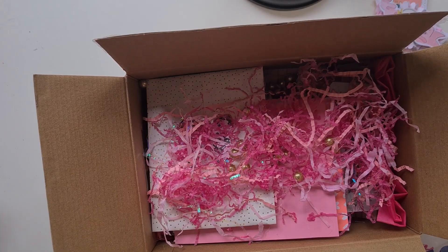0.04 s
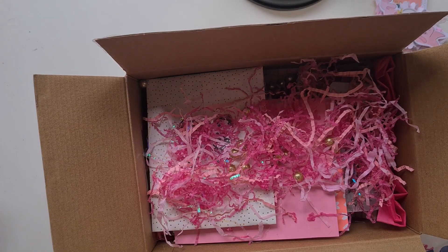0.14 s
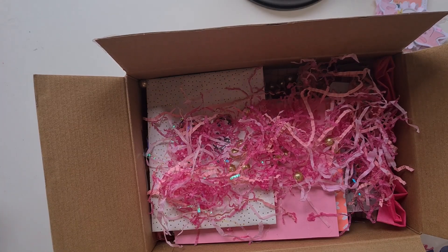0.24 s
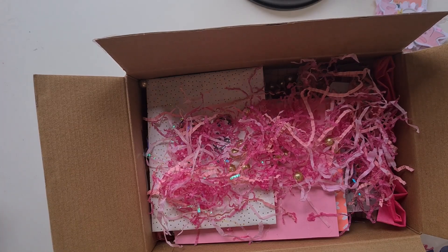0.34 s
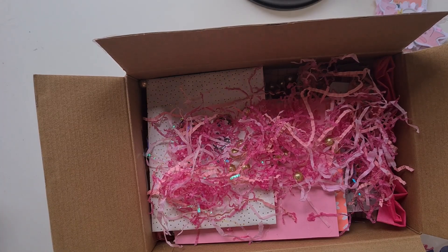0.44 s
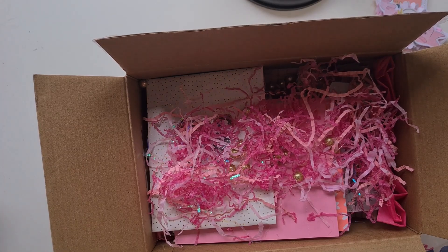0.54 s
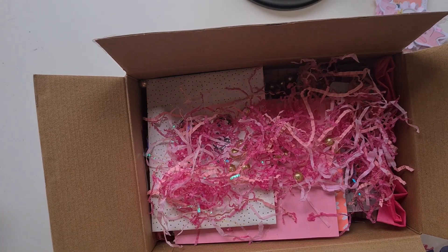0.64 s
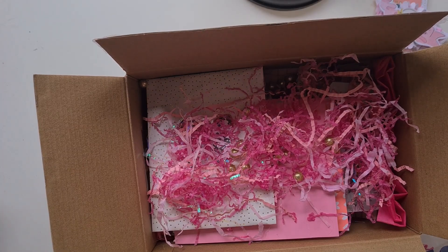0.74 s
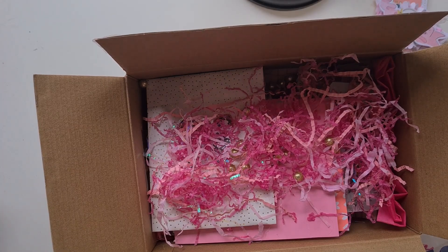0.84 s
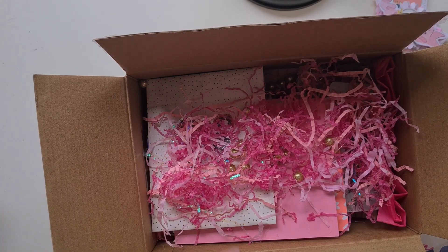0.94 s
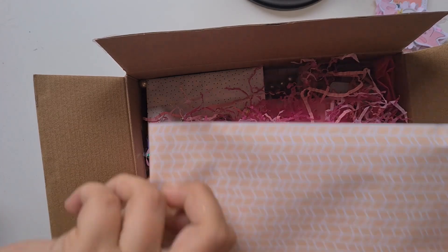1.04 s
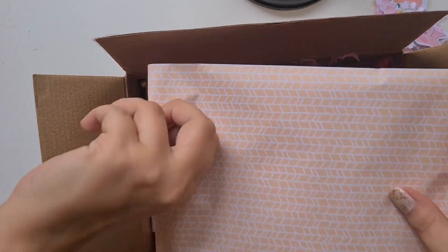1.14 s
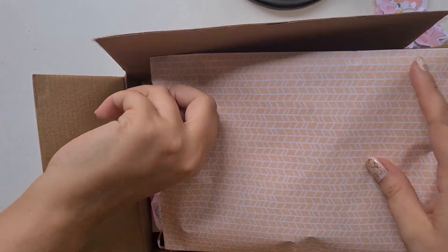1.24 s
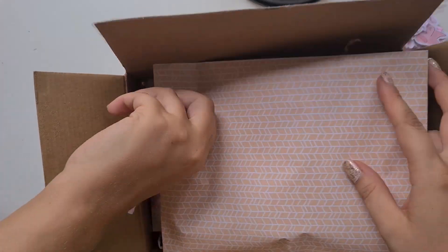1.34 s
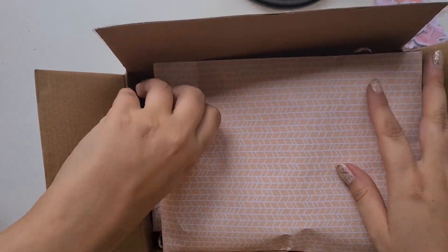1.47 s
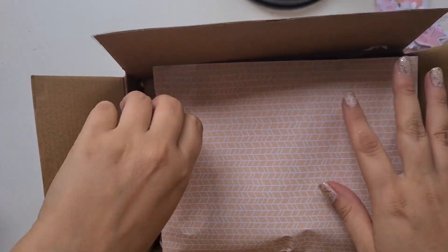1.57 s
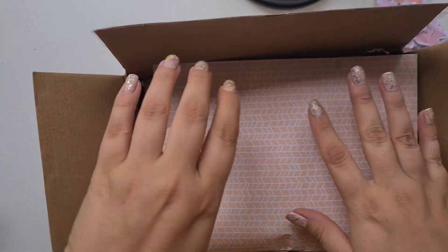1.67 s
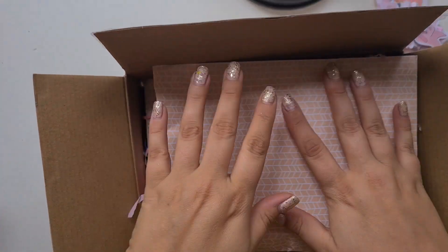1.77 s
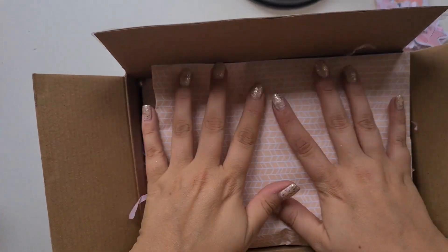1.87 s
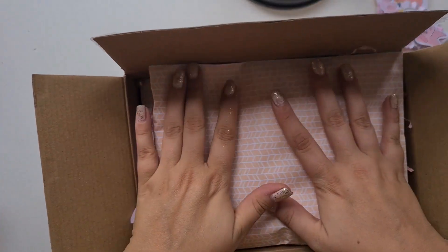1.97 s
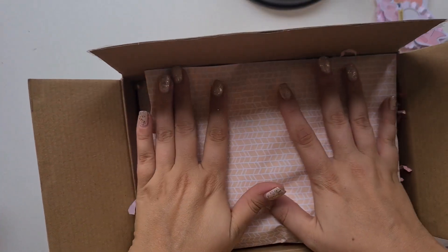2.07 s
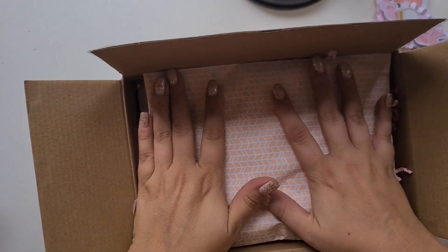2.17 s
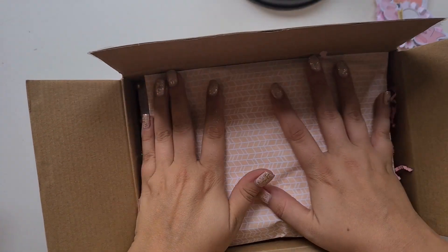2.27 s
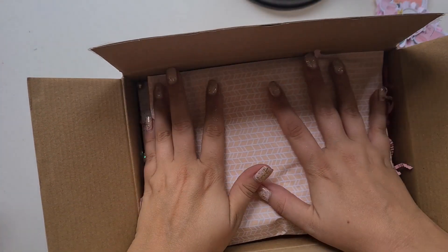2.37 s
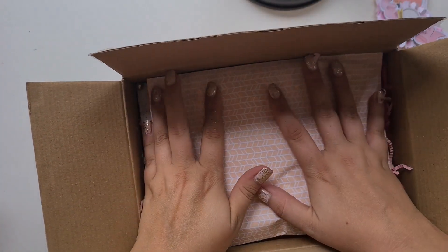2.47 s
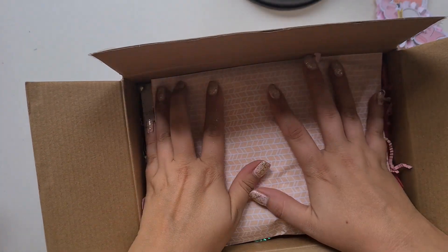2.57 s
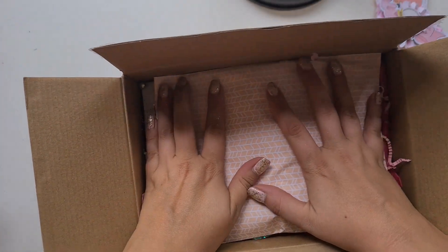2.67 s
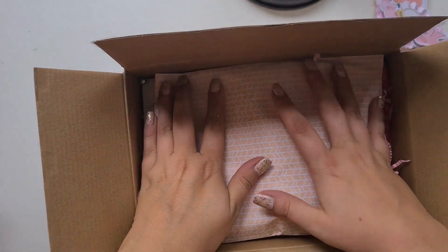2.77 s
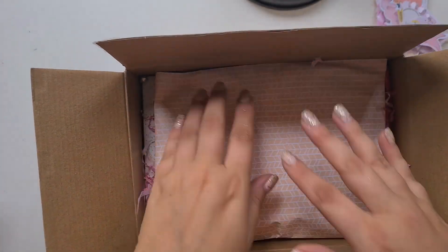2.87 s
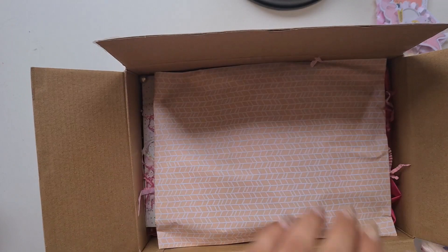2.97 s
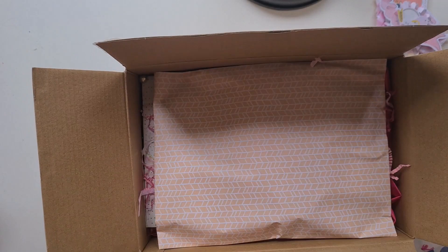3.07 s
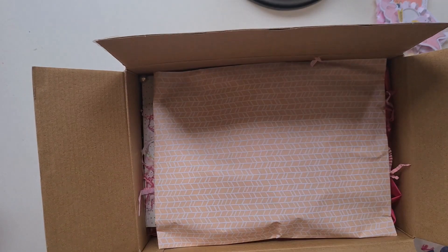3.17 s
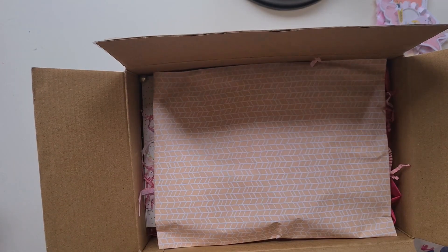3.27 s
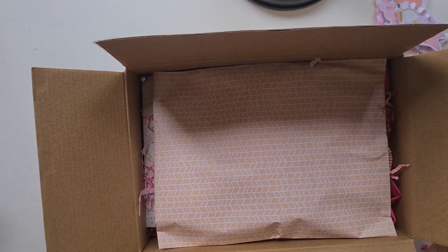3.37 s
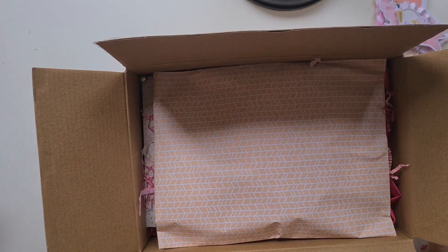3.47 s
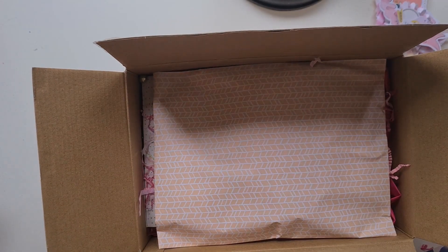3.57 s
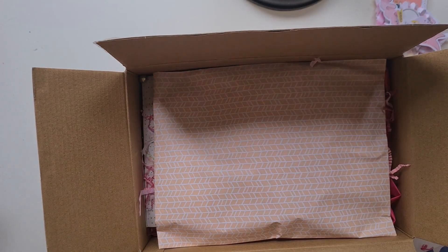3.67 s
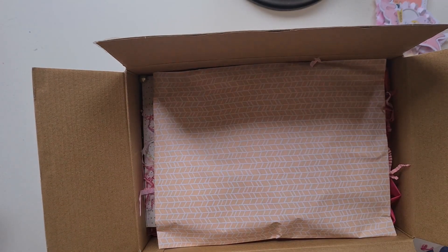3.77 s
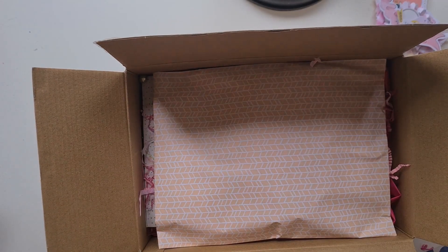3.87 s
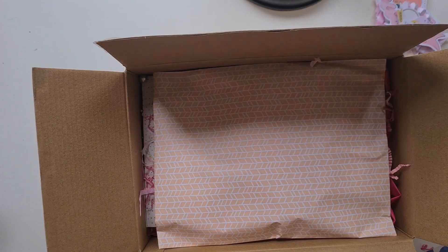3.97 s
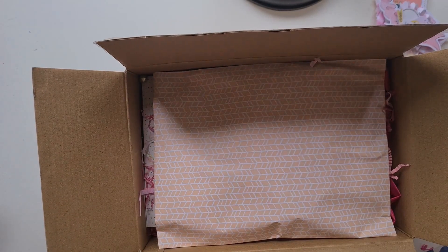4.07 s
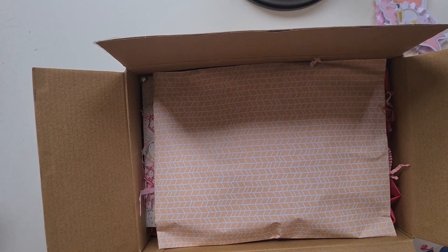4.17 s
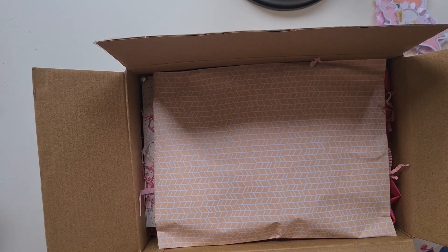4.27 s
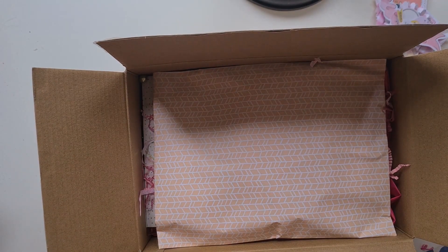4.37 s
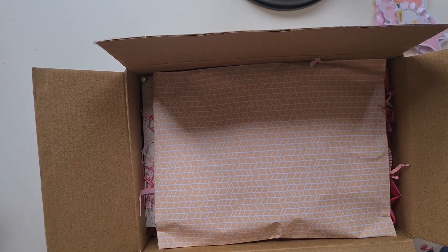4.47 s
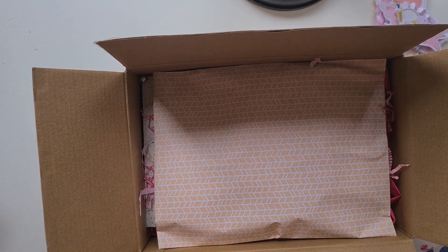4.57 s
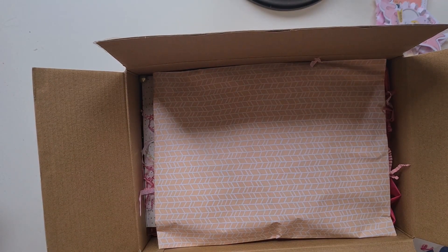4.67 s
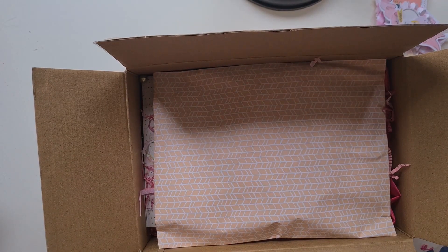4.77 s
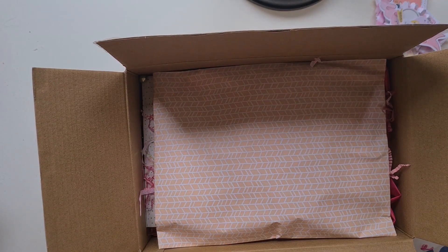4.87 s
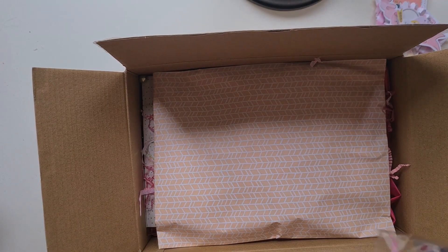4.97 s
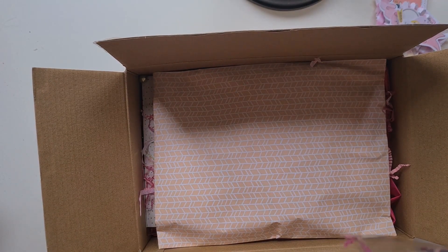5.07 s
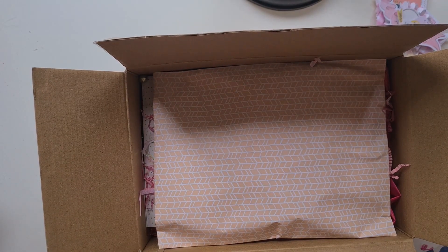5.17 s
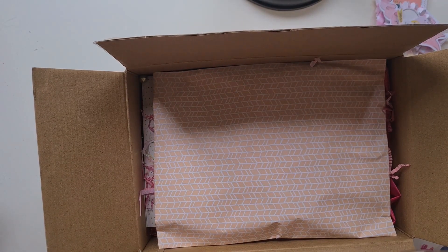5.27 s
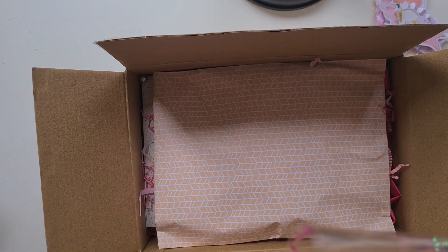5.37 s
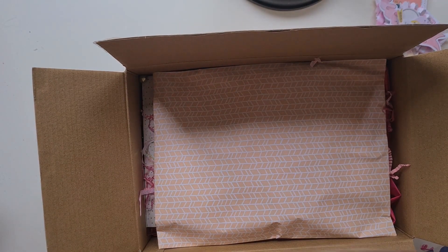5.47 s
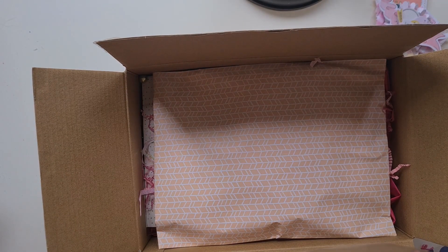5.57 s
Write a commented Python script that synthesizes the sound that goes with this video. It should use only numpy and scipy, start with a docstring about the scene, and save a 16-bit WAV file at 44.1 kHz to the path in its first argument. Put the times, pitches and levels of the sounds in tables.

```python
"""From the start, over faint room tone, hands slide a sheet of paper onto shredded filler in a cardboard box.
Tiny slips make its rustle, buckling patches snap sharply and short rubs sing; the box colours the paper.
Dull knocks follow as the sheet is pressed down. Then, beside the box, a thinner wrapping rustles and something
knocks on the table: noise for the clack, dying tones for the thud, fading narrow noise with a few tones
for the thin ring. A very short dry tick follows. Dense reflections from close walls surround it all."""
import sys
import numpy as np
from scipy import signal
from scipy.fft import rfft, irfft
from scipy.io import wavfile
from scipy.ndimage import uniform_filter1d, map_coordinates

SR = 44100
rng = np.random.default_rng(int(sys.argv[2]) if len(sys.argv) > 2 else 0)


def wav_record(signal):
    """Record a signal, one row per channel, as 16-bit PCM in the file named by sys.argv[1]."""
    frames = np.transpose(np.atleast_2d(signal))
    bounded = np.clip(frames, -1, 1)
    # unit amplitude maps onto the largest positive 16-bit level
    quanta = np.round(bounded * 32767).astype(np.int16)
    wavfile.write(sys.argv[1], SR, quanta)


N = 248283  # length in samples

# Faint steady room tone. Each row: frequency in Hz, relative level in dB.
ROOM_TONE_SPECTRUM = [(20, -18), (36, -30), (47, 2.5), (62, -10.5), (100, -5.5), (150, -26.5), (400, -26),
                      (1000, -27.5), (3000, -33), (7000, -33.5), (9000, -46.5), (16000, -41.5)]
# Hands moving the paper. Each row: start in seconds, length in seconds, level in dB before a common trim,
# body (low tones) in dB, fizz (high tones) in dB.
STROKES = [(0, 0.42, -50.5, 1, 3), (0.482, .03, -65, 6, 17.5), (0.565, 0.68, -58, 6.5, 5),
           (0.696, .065, -41.5, -6.5, -7), (0.839, 0.065, -47, 6.5, -2), (0.927, 0.033, -45, -2, 1),
           (1.01, .18, -46.5, 1.5, 2.5), (1.201, 0.39, -44, -2, 3.5), (1.271, 0.096, -39.5, 3.5, 8.5),
           (1.321, 0.14, -35.5, 7.5, -9), (1.56, 0.046, -43, 7, -18), (1.808, 0.058, -32.5, 2, -3.5),
           (1.869, 0.64, -39.5, 4, -2.5), (2.02, 0.074, -35.5, -4, 0), (2.12, 0.049, -27.5, 1, 1),
           (2.29, .12, -31, 7.5, -4), (2.508, 0.34, -39, 1, 2), (2.612, 0.065, -34.5, 6, 2),
           (2.745, 0.076, -30, 3, -5), (2.898, 0.03, -39.5, 3.5, 4.5), (2.954, 0.75, -63, 10, -2),
           (3.437, 0.06, -56, 7, -8), (3.478, 0.68, -44.5, 0.5, -0.5), (3.585, 0.13, -39, -1, 1.5),
           (3.834, 0.079, -33.5, 6.5, 3.5), (3.908, 0.091, -41.5, 11.5, -11.5), (4.03, .035, -38, 6, -36),
           (4.2, .07, -61.5, 12, -32), (4.573, 0.031, -62, 10, -11), (4.656, 0.35, -43, -0.5, 1.5),
           (4.712, 0.07, -31, -0.5, 1.5), (4.806, 0.034, -32, 4.5, -6), (4.996, 0.1, -28, 4, -3),
           (5.078, 0.55, -37.5, 1, 2), (5.134, 0.033, -30, 0.5, 0), (5.261, 0.18, -33.5, 2, -1.5),
           (5.546, 0.045, -32, 3, 1)]
# Colour of the sheet before the box shapes it. Each row: frequency in Hz, relative level in dB.
SHEET_SPECTRUM = [(40, -37), (70, -10.5), (130, -6.5), (220, -3), (400, -3), (700, -3.5), (1150, 1),
                  (1600, -4), (2400, -5.5), (3300, -4.5), (6400, -8), (9500, -16.5), (13000, -16),
                  (16000, -19.5)]
# Peaks and dips the box adds to the sheet. Each row: frequency in Hz, width in Hz, height in dB.
BOX_RESONANCES = [(273, 34, 3), (467, 14, 8), (500, 32, -8), (600, 74, 4.5), (700, 27, 3), (772, 24, 6),
                  (1160, 45, 2.5), (1895, 250, 4.5), (6250, 180, 1.5)]
# Colour of the thinner wrapping. Each row: frequency in Hz, relative level in dB.
WRAPPING_SPECTRUM = [(29, -16.5), (50, -8.5), (91, 0.5), (175, -3), (439, -1), (615, -5.5), (765, -3),
                     (927, -4), (1180, 2.5), (1540, -2.5), (3180, 0), (6710, -2), (9410, -10),
                     (12600, -6.5), (16000, -13.5)]
# Patches of paper that buckle, and at 4.147 s just a very short dry tick. Each row: start in seconds,
# level in dB over 4 ms before a common trim, pitch of the resonance in Hz, fizz in dB, decay time in seconds.
SNAPS = [(.005, -38.5, 790, -16, 0.0022), (0.0216, -37.5, 4740, -19, 0.0034),
         (0.0983, -38.5, 6360, 5, .002), (.1397, -42, 1000, -8, 0.0024), (0.1837, -42, 750, -3, 0.0038),
         (0.2322, -36, 1370, 0, 0.0029), (0.274, -25.5, 1800, 12.5, 0.0015),
         (0.3695, -45, 700, -2, 0.00079), (0.5435, -47.5, 790, -19, .004), (0.581, -35.5, 1640, -6, 0.0054),
         (0.591, -38, 2000, -11, 0.0034), (0.7002, -45, 2970, -3, 0.0015), (.7145, -33, 3500, -8, .0025),
         (.741, -28.5, 6360, -18, 0.0017), (0.8605, -33, 3200, -4, 0.0028),
         (0.8758, -29.5, 2100, -16, 0.0035), (1.004, -37.5, 4360, 2, 0.0011),
         (1.1147, -25, 5170, -13, 0.0021), (1.157, -34, 3520, 3, 0.0022),
         (1.2117, -22.5, 3670, -0.5, 0.0026), (1.2337, -20, 4720, -8, 0.0017),
         (1.2835, -28.5, 1230, -3, 0.002), (1.3929, -26, 3550, 1, 0.00087),
         (1.4064, -27, 3920, -11, 0.00076), (1.4774, -24, 700, -11, .0012), (1.8209, -29, 4770, 0, 0.0014),
         (1.8405, -26.5, 4200, 12, 0.00061), (1.8503, -18, 3580, -10, .0008),
         (1.9354, -25, 2250, 4, 0.00099), (2.0116, -28, 5700, -8, 0.0035), (2.0364, -22, 3220, 1.5, 0.0016),
         (2.07, -23, 1220, 3.5, 0.00065), (2.2498, -24, 2650, 11, 0.00085), (2.2667, -19, 700, -11, 0.0011),
         (2.2997, -18.5, 3000, 1, 0.00067), (2.334, -23, 1000, 8, 0.00083),
         (2.3797, -32.5, 6760, 15, 0.00063), (2.4406, -28, 2000, -21, 0.0015),
         (2.5251, -24, 1180, -1, 0.00049), (2.5387, -17.5, 6540, -8.5, 0.0013),
         (2.5928, -17.5, 850, -7, 0.0014), (2.6268, -25.5, 890, -3, 0.00072),
         (2.6406, -23, 2220, 14, 0.0013), (2.658, -23, 2680, -8, .0005), (2.6785, -25.5, 3000, 6.5, .0008),
         (2.7243, -26, 2930, 12.5, 0.00069), (2.7532, -23, 3230, 7.5, 0.0018),
         (2.773, -29, 1370, 12.5, 0.0042), (2.8439, -24, 700, 5.5, 0.00087), (3.1947, -57, 1650, 9, 0.0034),
         (3.3904, -47, 810, -32, 0.00066), (3.5036, -35.5, 6500, 7, 0.0026),
         (3.5873, -28, 1040, 0.5, 0.0045), (3.643, -36.5, 2240, 11, .001), (3.791, -35, 3500, 9, 0.0037),
         (3.9507, -31, 3580, -6, .0024), (4.147, -38, 5970, 1, 0.00027), (4.391, -59.5, 4300, 9.5, 0.0028),
         (4.5545, -57, 4770, -6, .001), (4.6701, -33.5, 2500, 2, 0.0022), (4.6913, -28.5, 2760, 1, 0.00091),
         (4.8129, -30.5, 6360, -0.5, .0016), (4.8317, -24, 920, 0, 0.0017),
         (4.9047, -25.5, 7000, -16, 0.0014), (4.9917, -31, 7000, -1, .002),
         (5.0472, -35, 3560, 20.5, 0.00068), (5.086, -25, 1490, -14, 0.0006),
         (5.1734, -23.5, 700, 6, 0.0068), (5.2399, -28.5, 2130, 8.5, 0.0018),
         (5.4743, -28.5, 700, 2, 0.0015), (5.5879, -29, 2190, 5.5, 0.0012)]
# Paper sliding on paper and singing briefly. Each row: start in seconds, length in seconds,
# pitch in Hz, width in Hz, level in dB.
RUBS = [(1.401, 0.055, 724, 200, -37.5), (1.567, 0.04, 1060, 300, -39), (2.127, 0.027, 6200, 800, -30.5),
        (2.759, 0.034, 1160, 300, -36), (2.895, 0.026, 1200, 500, -39), (3.521, 0.039, 2230, 500, -39.5),
        (4.024, .03, 3680, 600, -39.5), (4.292, 0.05, 500, 140, -49.5), (4.664, 0.036, 2500, 330, -35)]
# Blows on the box, then the table. Each row: start in seconds, thud in dB, clack in dB,
# clack decay time in seconds, thin ring in dB.
KNOCKS = [(2.297, -31, -50, .004, -88), (2.5138, -23, -43, 0.0061, -77), (2.523, -27, -60, .004, -82.5),
          (2.629, -27, -51, .004, -80), (2.810, -32.5, -52, .004, -80), (3.285, -47, -49, .003, -85),
          (3.845, -24.5, -12.5, 0.0055, -19.5), (3.908, -37, -22, 0.0044, -43),
          (4.0461, -23.5, -19.5, 0.0083, -38), (4.294, -46.5, -48.5, 0.0022, -79)]
# Tones of a thud before the box or table scales its pitch and speed. Each row: frequency in Hz,
# relative level in dB, time to fall by 60 dB in seconds.
THUD_MODES = [(109, -17.5, 0.25), (197, -2, 0.057), (251, -3, 0.079), (336, -12, 0.063), (416, -9.5, 0.1),
              (557, -17.5, 0.16), (736, -4.5, 0.0358), (1200, -3, 0.032)]
# Clear tones in the thin ring. Each row: frequency in Hz, relative level in dB,
# time to fall by 60 dB in seconds.
THIN_RING_MODES = [(12470, -12, .17), (12600, -17, .17), (13200, -13, .17), (13119, -18, .17)]
# Colour of the clack. Each row: frequency in Hz, relative level in dB.
CLACK_SPECTRUM = [(60, -40), (150, -24.5), (250, 7.5), (410, 5.5), (600, -9.5), (780, -2), (1100, 2.5),
                  (1800, -6.5), (3700, -3.5), (6300, -6), (9500, -18), (12700, -18), (16000, -28)]
# How fast reflections die. Each row: frequency in Hz, time to fall by 60 dB in seconds.
ROOM_DECAY = [(150, 0.27), (400, 0.28), (1000, 0.2), (3000, 0.23), (7000, 0.22), (15000, 0.24)]
# Strength of the reflections. Each row: frequency in Hz, level against the direct sound in dB.
ROOM_LEVEL = [(100, -9), (300, -5.5), (700, -6.5), (1500, -2.5), (8000, -4), (15000, -7.5)]
# Lean of rustle, rubs and knocks. Each row: frequency in Hz, left minus right in dB.
BALANCE = [(100, -8.5), (600, -0.6), (2500, -0.8), (5000, -2), (10000, -2.5), (14000, -5.5)]
# Stereo width. Each row: frequency in Hz, gain in dB on the difference between left and right.
WIDTH = [(50, -6.5), (150, -11), (350, -6), (700, -4.5), (1400, 0.5), (3000, 0), (16000, -0.5)]

WRAPPING_FROM_S = 3.42  # the wrapping and the table replace the sheet and the box
WRAPPING_LAG_S = 0.00028  # the wrapping lies to the right, so the left channel hears it later
ATTACK_S, RELEASE_S, SAG_DB = 0.014, 0.013, -3  # each stroke gathers speed, eases off a little and stops
SHEET_PAN_DB, WRAPPING_PAN_DB, PAN_SPREAD_DB = -1.8, -7, 3.5  # left minus right, for snaps
SNAP_DB, SNAP_BODY_DB, THINNER_DB_PER_DB = -31, -6.5, 0.36  # a typical snap; a harder one has less body
CREASE_DB, CREASE_SPREAD_DB, CREASE_FIZZ_DB = -1, 2.5, 6.5  # lesser snaps, against the stroke level
CREASE_HZ, CREASE_OCTAVES, CREASE_DECAY_S = 2000, 1.0, 0.0015  # their middle pitch, spread and decay
THIN_HZ, THIN_WIDTH_HZ, THIN_DECAY_S = 12860, 1000, 0.014  # a noise band around the thin ring's clear tones
BOX_PITCH, TABLE_PITCH = 0.85, 1.032  # the soft-filled box thuds lower and longer than the table
EDGE_HZ = 16000  # top of the sound's range


def amp(db):
    """Turns decibels into gain."""
    return 10 ** (np.asarray(db) / 20)


def evened(x):
    """Scales to an rms (average strength) of 1."""
    return x / np.sqrt(np.mean(x ** 2) + 1e-20)


def read(points, hz):
    """Reads between the rows of a table, with frequency on a log scale."""
    f, value = np.transpose(points)
    return np.interp(np.log(hz + 1), np.log(f + 1), value)


def bins(size):
    """Lists the frequencies in the spectrum of this many samples."""
    return np.fft.rfftfreq(size, 1 / SR)


def add(mix, s, sound):
    """Adds a stereo sound at time s in seconds."""
    part = mix[:, max(round(s * SR), 0):][:, :sound.shape[1]]
    part += sound[:, :part.shape[1]]


def colour(x, gain):
    """Filters to the given gains; it rings only after what excites it."""
    both_halves = np.r_[gain, gain[-2:0:-1]]
    log_gain = np.log(np.maximum(both_halves, 1e-5))
    taps = np.fft.ifft(np.exp(np.conj(signal.hilbert(log_gain)))).real
    return signal.oaconvolve(x, taps[None, :len(gain)], axes=1)[:, :x.shape[1]]


def room_tone():
    """A faint steady rumble and hiss, made from coloured noise."""
    noise = rfft(rng.standard_normal((2, N)))
    return amp(-58) * evened(irfft(noise * amp(read(ROOM_TONE_SPECTRUM, bins(N))), N))


def stroke_gains(t):
    """Strength of every stroke at times t: attack, sagging hold, release; shape (strokes, times)."""
    start, length, db = np.transpose(STROKES)[:3, :, None]
    age = t - start
    rise = np.clip(age / ATTACK_S, 0, 1)
    release = np.exp(-np.maximum(age - length, 0) / RELEASE_S)
    return amp(db + SAG_DB * np.clip(age / length, 0, 1)) * rise * release


def paper(in_box, hz):
    """Spectrum, of mean power 1, of the sheet in its box or of the wrapping."""
    if not in_box:
        return evened(amp(read(WRAPPING_SPECTRUM, hz)))
    box_db = sum(db / (1 + (2 * (hz - f) / w) ** 2) for f, w, db in BOX_RESONANCES)
    return evened(amp(read(SHEET_SPECTRUM, hz) + box_db))


def tilt(body_db, fizz_db, hz):
    """Large patches of paper add body, tight creases add fizz."""
    body = body_db * read([(350, 0.99), (1200, 0.074)], hz)
    fizz = fizz_db * read([(2500, 0), (9000, 1.0)], hz)
    return amp(body + fizz)


def facet(facet_hz, hz, peak_db):
    """The broad resonance of one small patch of paper."""
    octaves_away = np.log2((hz + 1) / facet_hz)
    return amp(peak_db * np.exp(-(octaves_away / 0.55) ** 2))


def flutter(t, decay_s, tone, lag_s, apart=0.74, rise_s=0.001):
    """A short shiver that builds and dies, with the spectrum and energy of tone, in two channels."""
    shared = rng.standard_normal(len(t))
    burst = shared + apart * rng.standard_normal((2, len(t)))
    burst = burst * np.exp(-t / decay_s) * (1 - np.exp(-t / rise_s))
    lag = round(lag_s * SR + rng.uniform(-5, 5))  # samples; positive delays the left
    burst = np.array([np.roll(burst[0], max(lag, 0)), np.roll(burst[1], max(-lag, 0))])
    # Divide out the burst's own smoothed spectrum so that the wanted tone remains.
    power = uniform_filter1d(np.mean(abs(rfft(burst)) ** 2, axis=0), size=len(t) // 64)
    shiver = evened(colour(burst, tone / np.sqrt(power)))
    return shiver * np.sqrt(np.mean(tone ** 2) / len(t))


def wander(per_s):
    """Smooth random ups and downs of rms 1."""
    size = int(SR / per_s)
    smooth = uniform_filter1d(rng.standard_normal(N), size)
    return evened(uniform_filter1d(smooth, size))


def patches(t, hz, per_s=45, per_octave=4, octaves=7):
    """Smooth random ups and downs over time and log frequency, of rms 1."""
    grid = rng.standard_normal((int(octaves * per_octave) + 2, int(N / SR * per_s) + 3))
    where = np.meshgrid(np.log2(1 + hz / 200) * per_octave, t * per_s, indexing="ij")
    return evened(map_coordinates(grid, where, order=1, mode="nearest"))


def crackle(per_s, spread_db, friction, clump_db, ring_s, lag_s):
    """Tiny uneven slips, each ringing a patch of paper at its own pitch, over sliding hiss; rms 1."""
    t, count = np.arange(512) / SR, 32
    slip_now = rng.random(N) < per_s / SR
    slips = amp(spread_db * np.minimum(rng.exponential(1, N), 3)) * slip_now
    place, ringing = rng.integers(0, count, N), np.zeros((2, N))
    for k, facet_hz in enumerate(np.geomspace(300, 18000, count)):
        tone = facet(facet_hz, bins(len(t)), peak_db=13)
        slip = flutter(t, ring_s * rng.uniform(0.5, 1.5), tone, lag_s)
        ringing += signal.oaconvolve((slips * (place == k))[None], slip, axes=1)[:, :N]
    hiss = friction * rng.standard_normal((2, N))
    return evened((evened(ringing) + hiss) * amp(clump_db * wander(80)))


def rustle(level_db=1.6):
    """Hand strokes set the crackle's level and tone; its resonances shift as the paper bends."""
    hz = bins(size=4096)
    sheet = crackle(per_s=1100, spread_db=3.5, friction=0.59, clump_db=1.0, ring_s=0.00076, lag_s=0)
    wrapping = crackle(per_s=1100, spread_db=3.0, friction=0.7, clump_db=2.0, ring_s=0.0005,
                       lag_s=WRAPPING_LAG_S)
    in_box = np.arange(N) < WRAPPING_FROM_S * SR
    handled = np.where(in_box, colour(sheet, paper(True, hz)), colour(wrapping, paper(False, hz)))
    hz, t, z = signal.stft(handled, SR, nperseg=256)  # spectrum moment by moment
    tones = np.transpose([tilt(body_db, fizz_db, hz) for *_, body_db, fizz_db in STROKES])
    strokes = np.sqrt(tones ** 2 @ stroke_gains(t) ** 2)  # overlapping strokes add in power
    bending = evened(amp(2.2 * patches(t, hz)))
    return amp(level_db) * signal.istft(z * bending * strokes, SR)[1][:, :N]


def creases(count=64):
    """Lesser snaps at random moments, following the strokes' strength; rows like those of SNAPS."""
    s = (np.arange(count) + rng.random(count)) * N / SR / count
    size, pitch = np.clip(rng.standard_normal((2, count)), -2, 2)
    motion_db = 20 * np.log10(np.linalg.norm(stroke_gains(s), axis=0) + 1e-6)
    level_db = motion_db + CREASE_DB + CREASE_SPREAD_DB * size
    facet_hz = CREASE_HZ * 2 ** (CREASE_OCTAVES * pitch)
    return [(*row, CREASE_FIZZ_DB, CREASE_DECAY_S) for row in zip(s, level_db, facet_hz)]


def snaps(level_db=-0.66):
    """Patches of paper flip over and flutter for a few milliseconds; one dry tick is made the same way."""
    hz, t, out = bins(size=2048), np.arange(2048) / SR, np.zeros((2, N))
    span = 0.004 * SR  # the stretch, in samples, that a snap's level refers to
    for s, db, facet_hz, fizz_db, decay_s in creases() + SNAPS:
        in_box = s < WRAPPING_FROM_S
        body_db = SNAP_BODY_DB - THINNER_DB_PER_DB * (db - SNAP_DB)
        pan_db = (SHEET_PAN_DB if in_box else WRAPPING_PAN_DB) + PAN_SPREAD_DB * rng.standard_normal()
        tone = paper(in_box, hz) * tilt(body_db, fizz_db, hz) * facet(facet_hz, hz, peak_db=7)
        snap = flutter(t, decay_s, tone, 0 if in_box else WRAPPING_LAG_S) * np.sqrt(span)
        add(out, s, amp(db + level_db + np.array([[0.5], [-0.5]]) * pan_db) * snap)
    return out


def rubs():
    """Friction feeds one resonance of the paper for the length of a rub."""
    hz, out = bins(size=1024), np.zeros((2, N))
    for s, length_s, rub_hz, width_hz, db in RUBS:
        size = int(length_s * SR)
        resonance = 1 / (1 + ((hz - rub_hz) / width_hz) ** 2)
        sing = colour(rng.standard_normal((2, size)), resonance)
        add(out, s, amp(db) * evened(sing) * signal.windows.tukey(size, 0.5))
    return out


def ring(modes, t):
    """Dying tones, each starting at a random point in its swing."""
    return sum(amp(db - 60 * t / t60) * np.sin(2 * np.pi * (hz * t + rng.random()))
               for hz, db, t60 in modes)


def knocks(rise_s=0.0004, thud_rise_s=0.001):
    """A noisy clack of contact, the low thud of the board, and a thin ring of narrow noise and a few tones."""
    t, hz, out = np.arange(SR // 3) / SR, bins(size=2048), np.zeros((2, N))
    clack_tone = evened(amp(read(CLACK_SPECTRUM, hz)))
    thin_band = evened(1 / (1 + ((hz - THIN_HZ) / THIN_WIDTH_HZ) ** 2))
    for s, thud_db, clack_db, decay_s, ring_db in KNOCKS:
        clack = colour(rng.standard_normal((2, len(t))) * np.exp(-t / decay_s), clack_tone)
        pitch = BOX_PITCH if s < WRAPPING_FROM_S else TABLE_PITCH
        thud = ring(THUD_MODES, t * pitch) * (1 - np.exp(-t / thud_rise_s))
        thin_noise = colour(rng.standard_normal((2, len(t))) * np.exp(-t / THIN_DECAY_S), thin_band)
        thin = (thin_noise + ring(THIN_RING_MODES, t)) * amp([[-4], [0]])  # softer on the left
        knock = amp(clack_db) * clack + amp(thud_db) * thud + amp(ring_db) * thin
        add(out, s, knock * (1 - np.exp(-t / rise_s)))
    return out


def room(x, first_s=0.0004):
    """Close walls: dense reflections, each band dying at its own speed; the bass stays fairly dry."""
    taps = rng.standard_normal((2, SR // 2)) * (rng.random((2, SR // 2)) < 0.15)
    hz, t, z = signal.stft(taps, SR, nperseg=256)
    tail = signal.istft(z * amp(-60 * t / read(ROOM_DECAY, hz)[:, None]), SR)[1]
    tail = tail * np.minimum(np.arange(tail.shape[1]) / SR / first_s, 1) ** 2
    tail = tail / np.linalg.norm(tail, axis=1, keepdims=True)
    tail = colour(tail, amp(read(ROOM_LEVEL, bins(size=1024))))
    return signal.fftconvolve(x, tail, axes=1)[:, :N]


def scene():
    """Paper and knocks in the room, a little to the right; the bass is the most alike in both channels."""
    hz = bins(N)
    lean = amp(np.array([[0.5], [-0.5]]) * read(BALANCE, hz))
    direct = irfft(rfft(rustle() + rubs() + knocks()) * lean, N) + snaps()
    left, right = rfft(direct + room(direct) + room_tone())
    width = amp(read(WIDTH, hz))
    mid, side = (left + right) / 2, width * (left - right) / 2
    loudness = np.sqrt(2 / (1 + width ** 2))  # makes up for the narrowed side
    return irfft(np.array([mid + side, mid - side]) * loudness, N)


def record(dry):
    """Filters away what lies above the top of the range."""
    low_pass = signal.firwin(255, EDGE_HZ, window=("kaiser", 9), fs=SR)
    return signal.oaconvolve(dry, low_pass[None], "same")


dry = scene()
out = record(dry)
wav_record(out)
```